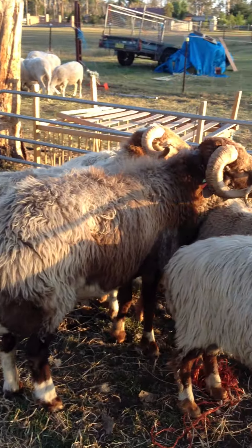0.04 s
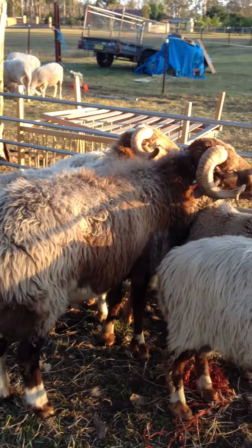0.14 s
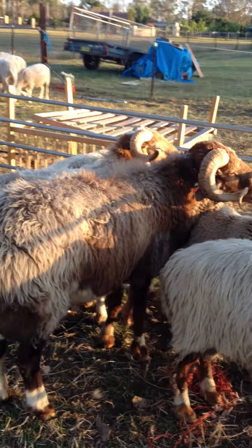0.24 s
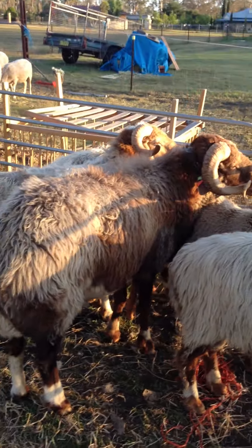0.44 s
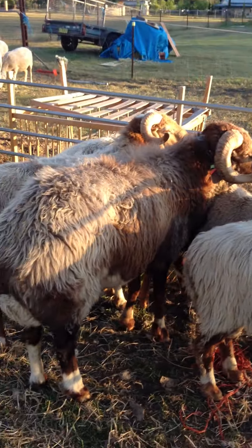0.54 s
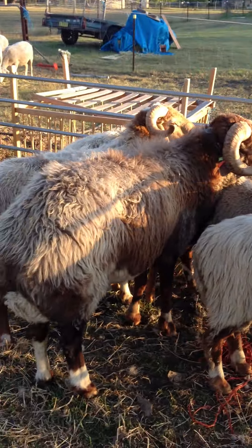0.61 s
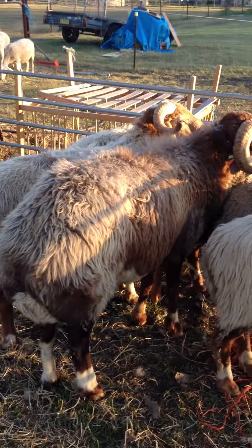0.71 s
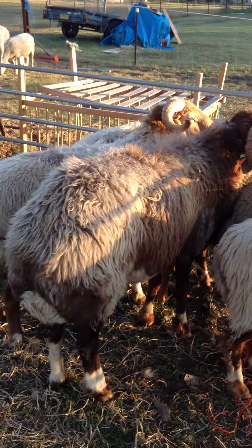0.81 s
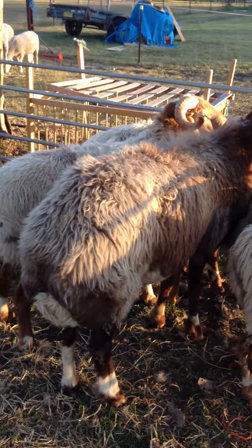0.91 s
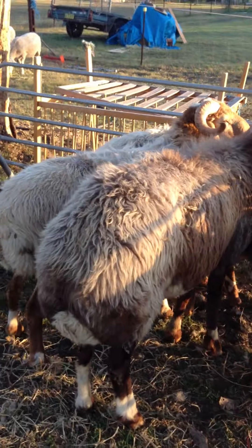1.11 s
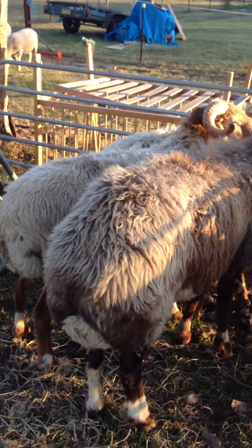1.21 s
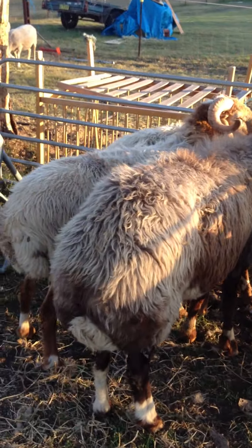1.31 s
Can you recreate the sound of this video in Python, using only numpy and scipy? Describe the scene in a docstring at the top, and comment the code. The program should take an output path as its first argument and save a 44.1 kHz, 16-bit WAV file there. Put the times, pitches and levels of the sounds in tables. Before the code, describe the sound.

Dull, uneven thumps of sheep hooves on turf come in small clusters near the microphone, with dry grass rustling, then thin out. Behind them are faint outdoor wind and a far bird's brief falling whistle and tiny chirp.

```python
"""Rams shift their feet on dry turf in an outdoor pen, close to a small microphone.
Each hoof pushes into the ground, which answers with a dull thud; lighter treads patter between.
Dry grass crackles as legs brush through it, and stalks snap.
A distant bird gives one falling whistle and a brief high chirp over faint wind and microphone hiss."""
import sys
import numpy as np
from scipy import signal
from scipy.fft import rfft, irfft, next_fast_len
from scipy.io import wavfile
from scipy.ndimage import uniform_filter1d

SR = 44100
rng = np.random.default_rng(int(sys.argv[2]) if len(sys.argv) > 2 else 0)


def waveform_to_disk(signal):
    """Save audio, clipped to [-1, 1], as 16-bit WAV at the path in sys.argv[1]."""
    frames = np.transpose(np.atleast_2d(signal))
    scaled = np.clip(frames, -1, 1) * 32767
    samples = np.round(scaled).astype(np.int16)
    wavfile.write(sys.argv[1], SR, samples)


N = 59535
TIME_S = np.arange(N) / SR

# Hoof contacts. Each row: time in seconds, peak level in dB, contact width in ms.
HOOF_CONTACTS = [(0.0424, -35.5, 1.28), (0.058, -43.5, 1.2), (0.1245, -39.5, 1.46), (.1425, -39, 1.3),
                 (.1710, -39.5, 1.74), (.1940, -35.5, 0.81), (.2240, -33.5, 0.83), (0.234, -23, 0.73),
                 (0.2452, -28, 1.2), (0.2581, -35, 1), (0.3332, -37.5, 1.15), (0.399, -34, 0.94),
                 (0.4068, -30.5, 0.98), (0.4265, -29.5, 0.77), (0.4321, -26, 1.3), (0.4374, -12, 0.92),
                 (0.442, -32, 1.04), (0.4743, -37, 1.36), (0.4821, -32, 1.06), (0.504, -31, 0.99),
                 (0.5091, -25, 1.15), (0.5171, -24, 0.99), (0.5379, -36.5, 1.14), (.5590, -41, 1.23),
                 (0.6683, -38, 1.33), (0.682, -40, 1.3), (.7490, -30.5, 1.3), (.7540, -31.5, 1.67),
                 (0.7591, -29, 1.43), (0.7679, -25.5, 1.16), (.7870, -36, 0.92), (0.7965, -40, 0.8),
                 (0.8249, -37, 0.92), (0.8428, -35, 1.05), (1.0590, -46.5, 1.04), (1.0893, -38.5, 0.84),
                 (1.2651, -42.5, 0.76)]
# Level of the light treading. Each row: time in seconds, level in dB.
TREAD_LEVELS = [(0, -52.5), (.085, -63), (.14, -48), (.205, -41), (.28, -39), (.315, -55.5), (.37, -47),
                (.42, -41), (.465, -47), (.53, -44.5), (.59, -53.5), (.645, -54), (.71, -57.5),
                (.78, -44.5), (.855, -46.5), (.94, -68.5), (1.05, -56.5), (1.16, -64), (1.35, -53)]
# Brushes through grass. Each row: peak time in seconds, level in dB,
# rise and fall time constants in seconds, tuft pitch in Hz.
GRASS_BRUSHES = [(0.209, -61.5, 0.022, 0.023, 3500), (0.256, -57, 0.053, 0.039, 1070),
                 (.302, -52, 0.0096, 0.011, 1870), (.435, -66.5, 0.12, 0.087, 4800),
                 (0.439, -52.5, .004, 0.0065, 754), (0.807, -57, 0.016, 0.055, 1710),
                 (.815, -60.5, 0.028, 0.039, 3900), (.882, -58, 0.031, 0.048, 1110),
                 (0.898, -55.5, 0.036, 0.016, 2830), (0.905, -54.5, 0.0048, 0.01, 557),
                 (1.20, -69, 0.1, 0.054, 3140), (1.26, -66.5, 0.11, 0.11, 563)]
# Dry grass spectrum. Each row: frequency in Hz, relative density in dB.
GRASS_SPECTRUM = [(400, 4.5), (600, 2.5), (1050, 2), (1400, -4), (1850, -2), (2400, -11), (3700, -11),
                  (4900, -14), (6000, -20.5), (9000, -31.5), (14000, -37.5)]
# Stalk snaps and, at 1.171 s, a faint high chirp from the distant bird.
# Each row: start in seconds, peak level in dB, pitch in Hz.
SNAPS_AND_CHIRP = [(.170, -53.5, 1980), (.300, -44.5, 1820), (.316, -51, 2470), (0.828, -47.5, 1670),
                   (0.9017, -45.5, 2760), (1.131, -49.5, 2300), (1.171, -54, 3400), (1.222, -52.5, 2280),
                   (1.224, -49.5, 1140)]
# Wind spectrum. Each row: frequency in Hz, relative density in dB.
WIND_SPECTRUM = [(25, -29.5), (60, -10.5), (130, 7), (280, -4.5), (500, -6), (750, -7.5), (1050, -10),
                 (1400, -13.5), (2300, -15), (3300, -20), (4700, -21.5), (5800, -27), (7500, -30.5)]
# Microphone hiss spectrum. Each row: frequency in Hz, relative density in dB.
HISS_SPECTRUM = [(3000, -1.5), (8000, -3.5), (9700, -8), (11000, -3.5), (12500, 0.5), (15000, 1)]


def hoof_thuds(rim_width_ms=0.47, rim_db=-26.5):
    """Each hoof pushes once into the turf; its hard rim adds a brief knock."""
    out = np.zeros(N)
    for time_s, peak_db, width_ms in HOOF_CONTACTS:
        force = contact_pulse(time_s, width_ms) + from_db(rim_db) * contact_pulse(time_s, rim_width_ms)
        thud = turf(force)
        out += from_db(peak_db) * thud / np.abs(thud).max()
    return out


def contact_pulse(time_s, width_ms):
    """The turf gives, stops the hoof and springs back; a shorter contact is brighter."""
    offset_squared = np.minimum(((TIME_S - time_s) * 1000 / width_ms) ** 2, 160)
    return (1 - offset_squared) * np.exp(-.5 * offset_squared)


def turf(force, mic_low_cut_hz=98, ring_hz=163.3, bandwidth_hz=51.4, ring_gain=0.97):
    """The ground rings briefly and dully; the microphone's low-cut thins the deep bass."""
    thud = signal.sosfilt(signal.butter(2, mic_low_cut_hz, "high", fs=SR, output="sos"), force)
    ring = signal.lfilter(*signal.iirpeak(ring_hz, ring_hz / bandwidth_hz, fs=SR), thud)
    return thud + ring_gain * ring


def light_treads(treads_per_s=150, width_ms=1.16, spread_db=2.5):
    """Many light contacts at uneven times patter on the same ground."""
    force = np.zeros(N)
    for k, (jitter, strength) in enumerate(rng.standard_normal((400, 2))):
        time_s = (k + .4 * jitter) / treads_per_s
        if time_s < TIME_S[-1]:
            force += from_db(spread_db * strength) * contact_pulse(time_s, width_ms)
    patter = turf(force)
    running_rms = np.sqrt(uniform_filter1d(patter ** 2, size=2600) + 1e-9)
    level_db = np.interp(TIME_S, *np.transpose(TREAD_LEVELS))
    return patter / running_rms * from_db(level_db)


def grass_rustle(crackles_per_s=2500, spread_db=3, tuft_q=2.27, ring_gain=2.65):
    """Tiny crackles swell and fade with each brush, coloured by the bent tuft."""
    out = np.zeros(N)
    for peak_s, level_db, rise_s, fall_s, tuft_hz in GRASS_BRUSHES:
        sizes = from_db(spread_db * np.minimum(rng.exponential(1, N), 3))
        signs = rng.choice([-1, 1], N)
        onsets = rng.random(N) < crackles_per_s / SR
        crackles = colour(sizes * signs * onsets, GRASS_SPECTRUM)
        ring = signal.lfilter(*signal.iirpeak(tuft_hz, tuft_q, fs=SR), crackles)
        swell = np.exp(-np.maximum((peak_s - TIME_S) / rise_s, (TIME_S - peak_s) / fall_s))
        out += from_db(level_db) * swell * unit_rms(crackles + ring_gain * ring)
    return out


def snaps_and_chirp(decay_s=0.0019, width_octaves=0.53):
    """Stalk snaps and one faint bird chirp: each a few milliseconds of noise around its pitch."""
    out = np.zeros(N)
    edge_ratio = 2 ** (width_octaves / 2)
    for start_s, peak_db, hz in SNAPS_AND_CHIRP:
        band = signal.butter(2, [hz / edge_ratio, hz * edge_ratio], "band", fs=SR, output="sos")
        envelope = (TIME_S >= start_s) * np.exp(-np.abs(TIME_S - start_s) / decay_s)
        burst = envelope * signal.sosfilt(band, rng.standard_normal(N))
        out += from_db(peak_db) * burst / np.abs(burst).max()
    return out


def bird_whistle(start_s=.598, length_s=0.074, level_db=-62.5):
    """A far whistle drops quickly onto a note; the field scatters a faint echo."""
    note_hz, drop_hz, settle_s = 2253, 1400, .0105
    attack_s, release_s = 0.0084, 0.01
    echo_db, echo_decay_s = -13, 0.027
    age_s = np.maximum(TIME_S - start_s, 0)
    pitch_hz = note_hz + drop_hz * np.exp(-age_s / settle_s)
    attack = np.sqrt(np.clip(age_s / attack_s, 0, 1))
    release = np.clip((length_s - age_s) / release_s, 0, 1)
    whistle = attack * release * np.sin(2 * np.pi * np.cumsum(pitch_hz) / SR)
    scatter = rng.standard_normal(N) * np.exp(-TIME_S / echo_decay_s)
    echo = signal.fftconvolve(whistle, scatter / np.linalg.norm(scatter))[:N]
    return from_db(level_db) * (whistle + from_db(echo_db) * echo)


def wind(level_db=-60, waver_db=1.56):
    """Light wind over the pen, its level wavering slowly."""
    drift = np.interp(TIME_S, np.linspace(0, TIME_S[-1], 14), rng.standard_normal(14))
    return from_db(level_db + waver_db * drift) * colour(rng.standard_normal(N), WIND_SPECTRUM)


def microphone_hiss(level_db=-76):
    """The microphone's own steady noise."""
    return from_db(level_db) * colour(rng.standard_normal(N), HISS_SPECTRUM)


def colour(x, spectrum):
    """Filter x by a spectrum table, rolling off beyond its ends; unit rms."""
    hz, db = np.transpose(spectrum)
    size = next_fast_len(N + 2000)
    bin_hz = np.maximum(np.arange(size // 2 + 1) * SR / size, 1)
    skirts = np.minimum(1, np.minimum(bin_hz / hz[0], hz[-1] / bin_hz)) ** 5
    gain = skirts * from_db(np.interp(np.log(bin_hz), np.log(hz), db))
    return unit_rms(irfft(rfft(x, size) * gain, size)[:N])


def from_db(db):
    """Decibels to gain."""
    return 10 ** (np.asarray(db) / 20)


def unit_rms(x):
    """Scale to unit rms."""
    return x / np.sqrt(np.mean(x ** 2) + 1e-20)


def scene():
    """All sources at one microphone."""
    rams = hoof_thuds() + light_treads() + grass_rustle()
    return (rams + snaps_and_chirp() + bird_whistle() + wind() + microphone_hiss())[None]


def record(dry):
    """Steep low-pass on the top treble."""
    cutoff_hz = 15400
    return signal.sosfilt(signal.ellip(12, .1, 70, cutoff_hz, fs=SR, output="sos"), dry)


dry = scene()
out = record(dry)
waveform_to_disk(out)
```